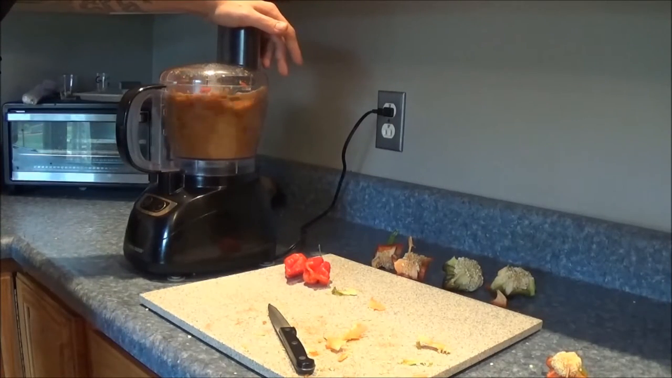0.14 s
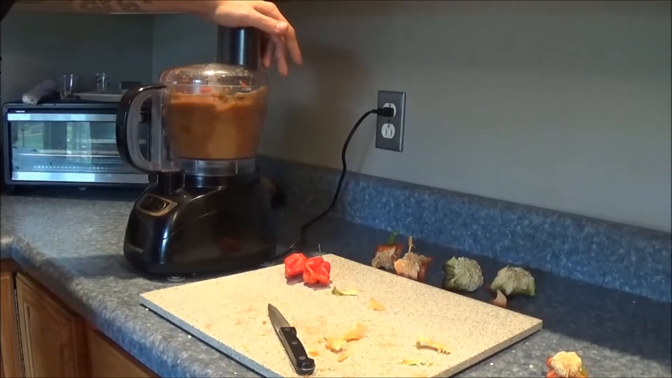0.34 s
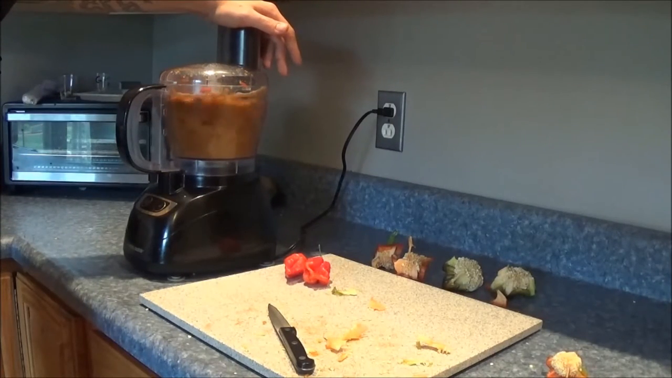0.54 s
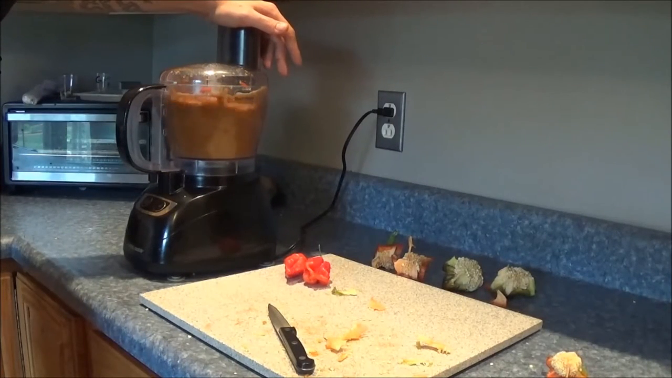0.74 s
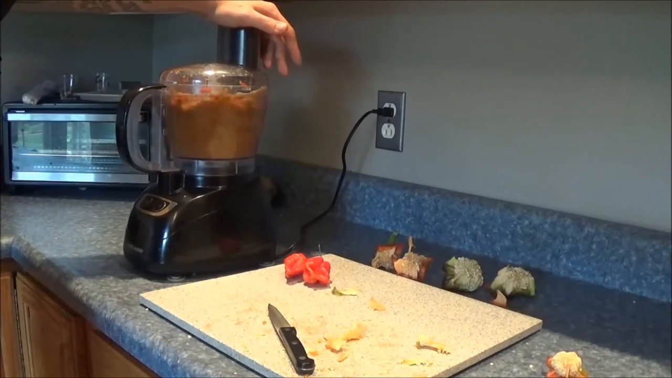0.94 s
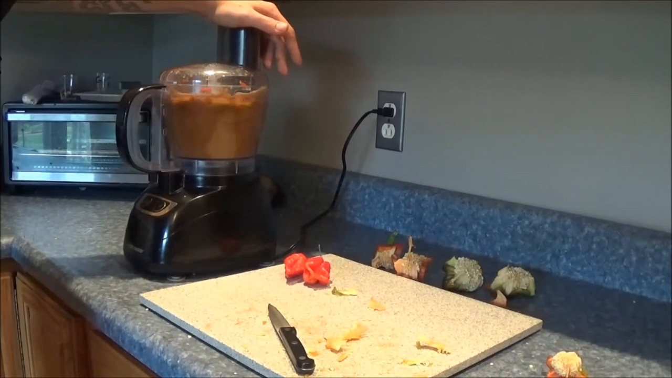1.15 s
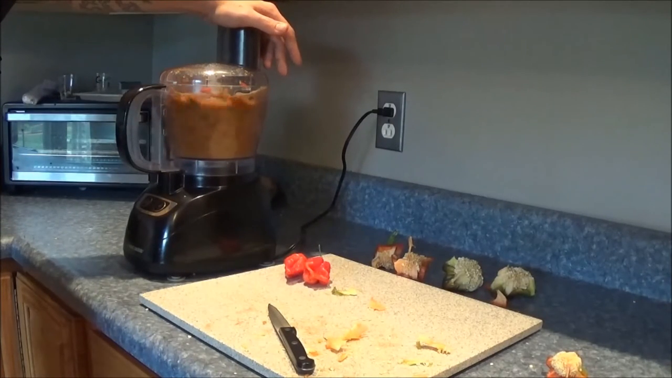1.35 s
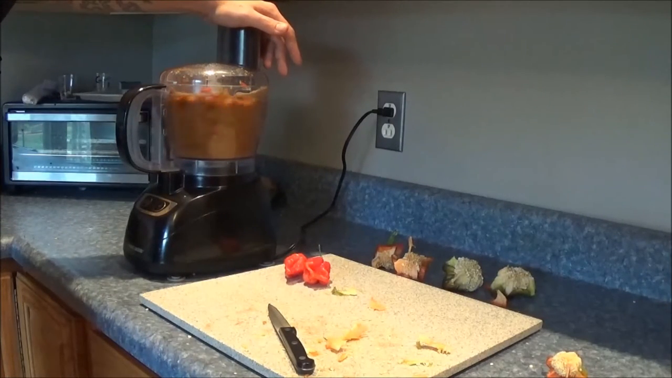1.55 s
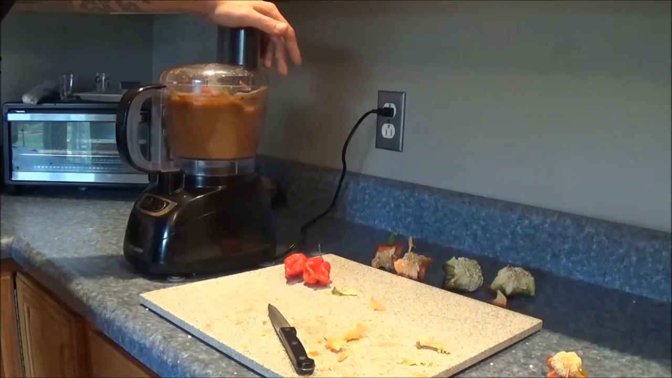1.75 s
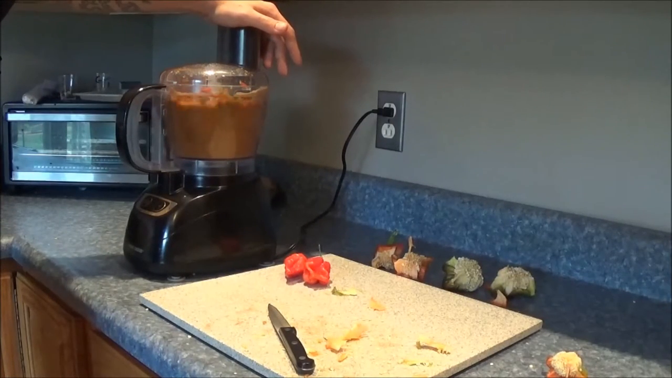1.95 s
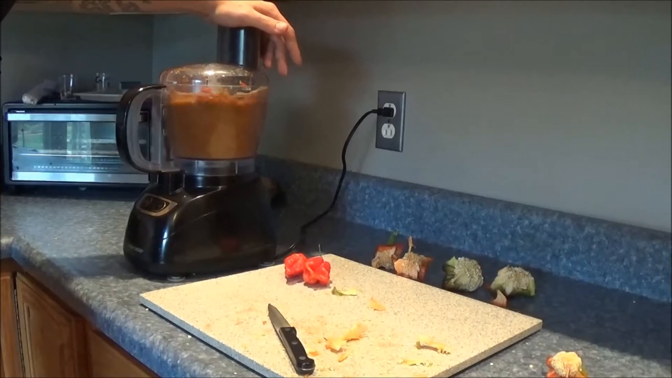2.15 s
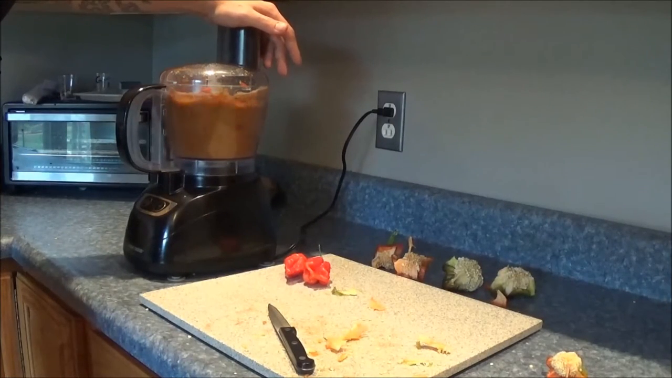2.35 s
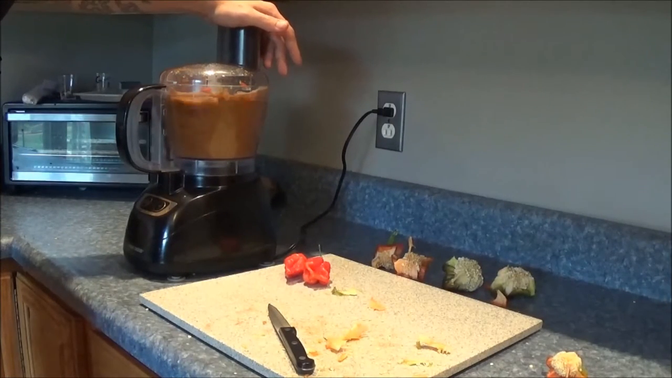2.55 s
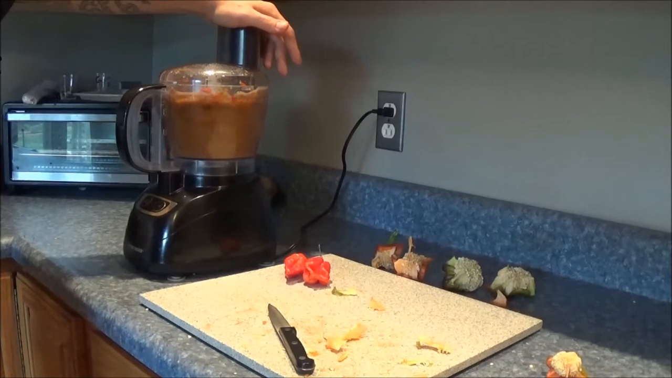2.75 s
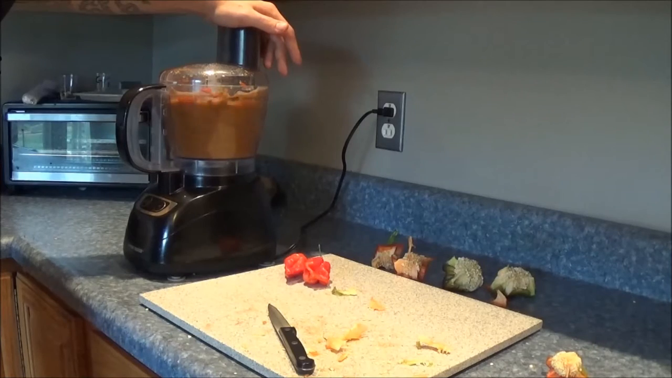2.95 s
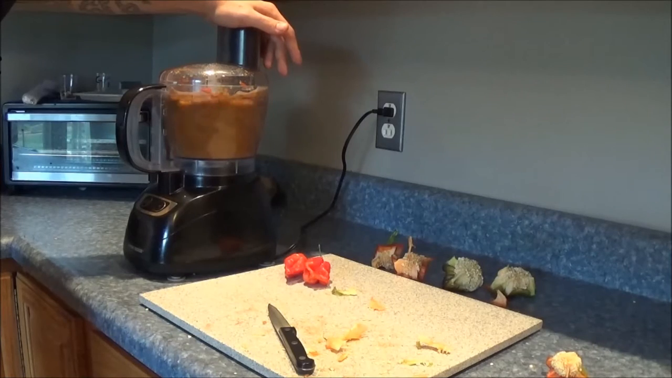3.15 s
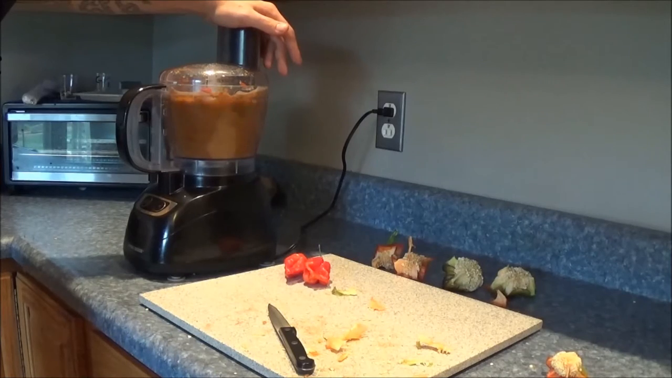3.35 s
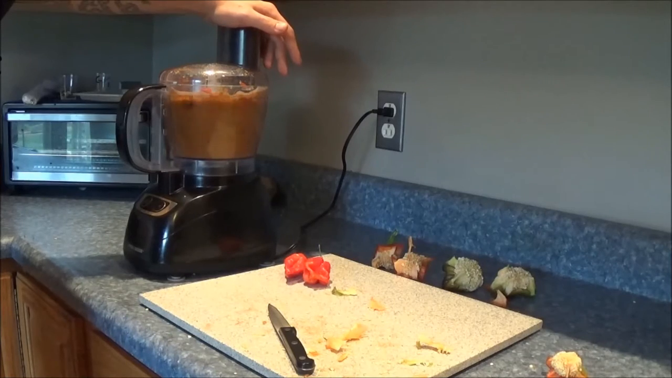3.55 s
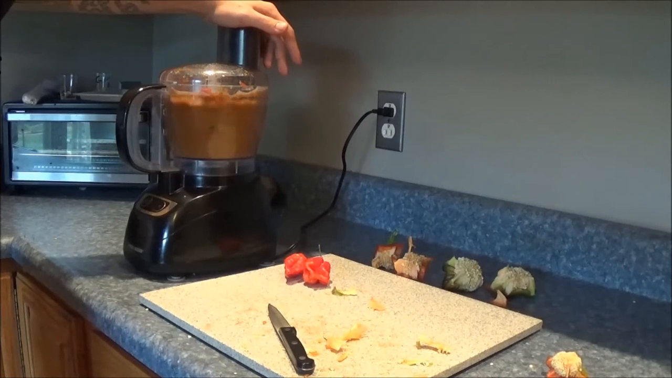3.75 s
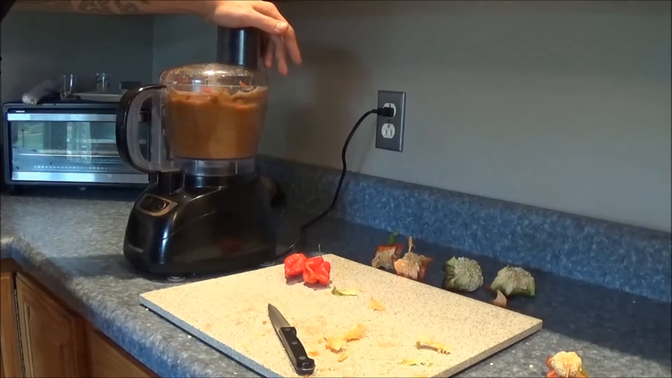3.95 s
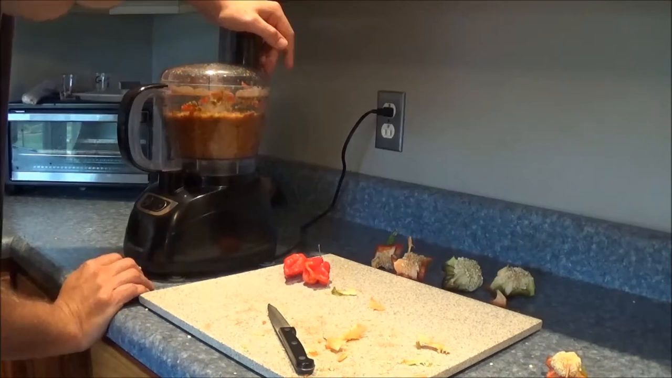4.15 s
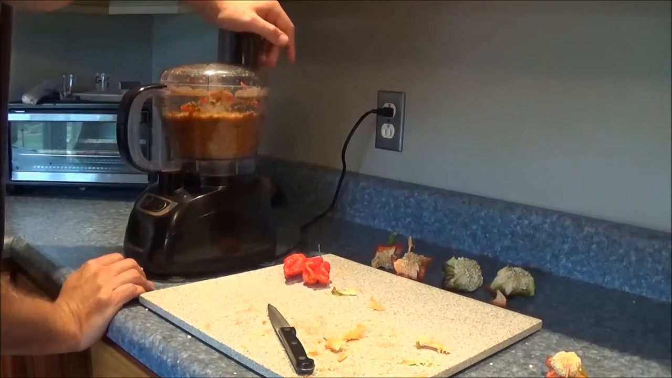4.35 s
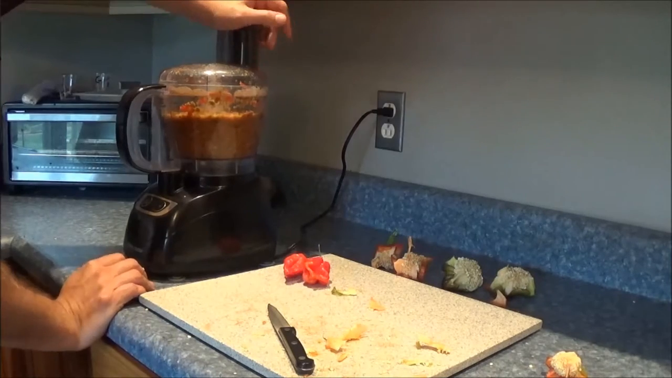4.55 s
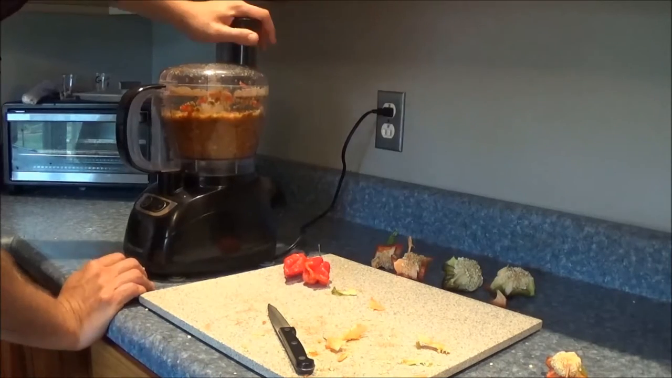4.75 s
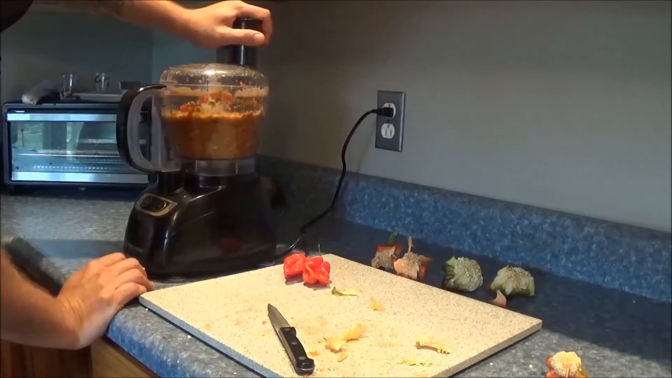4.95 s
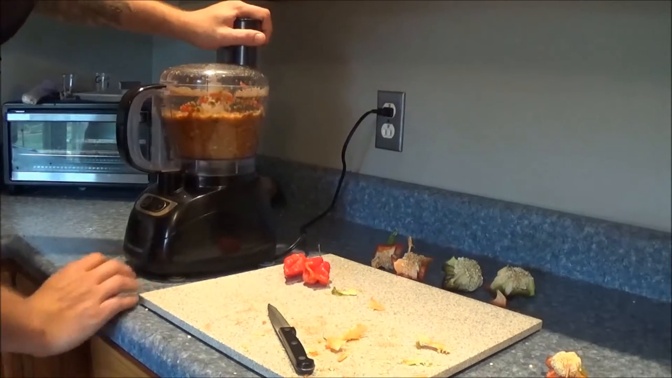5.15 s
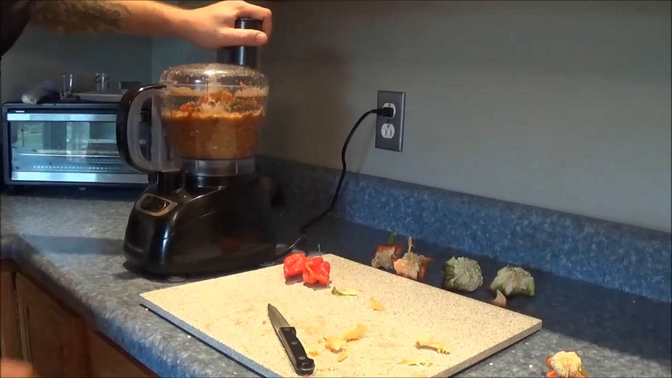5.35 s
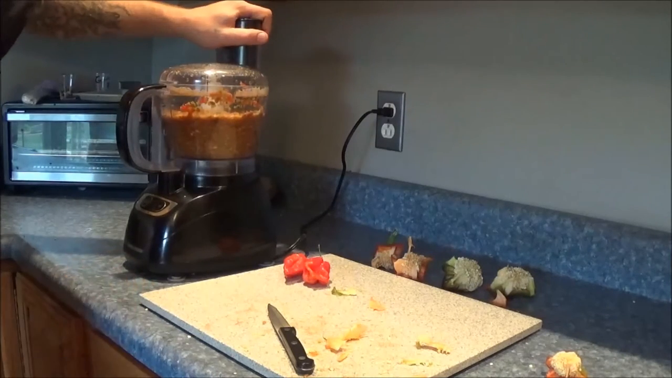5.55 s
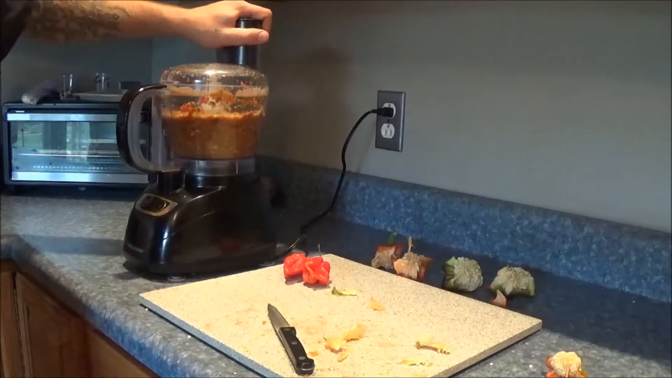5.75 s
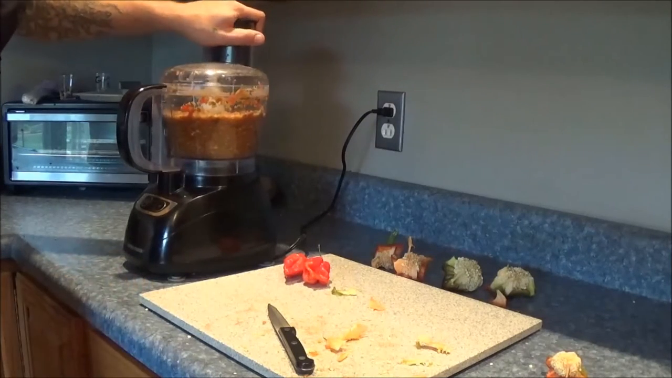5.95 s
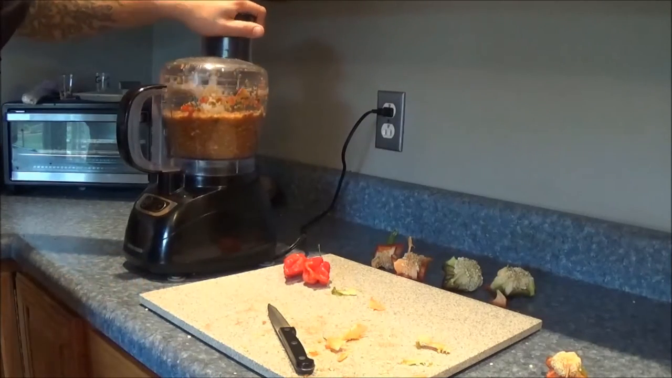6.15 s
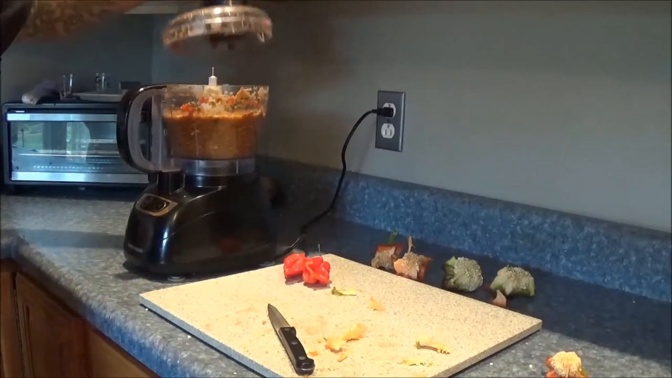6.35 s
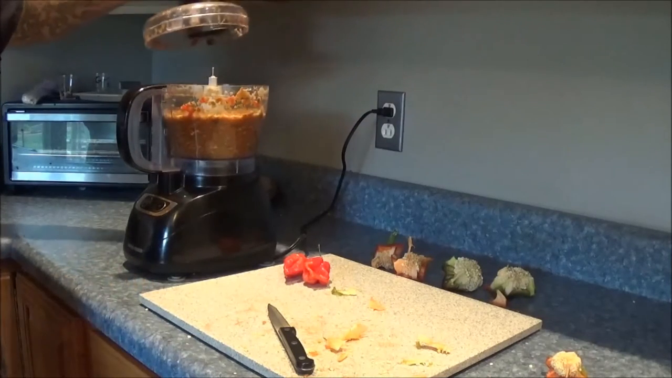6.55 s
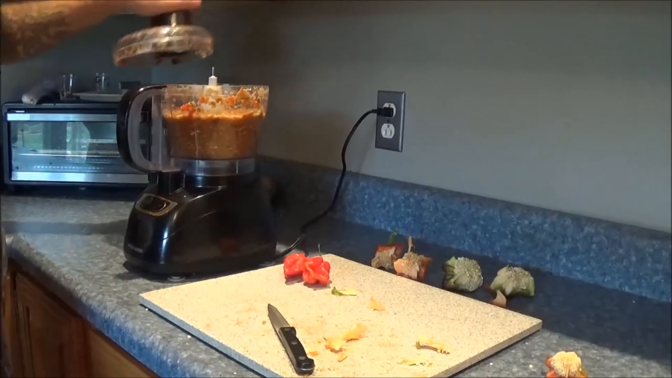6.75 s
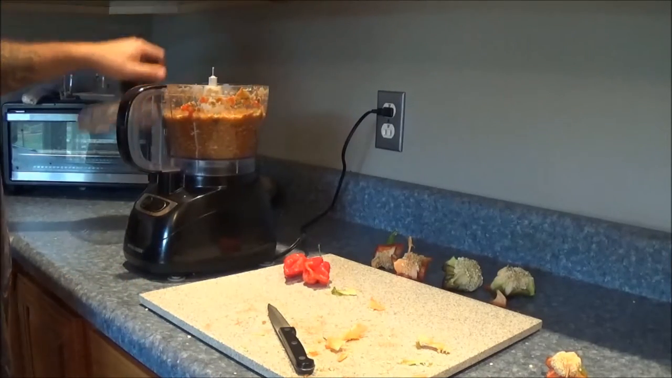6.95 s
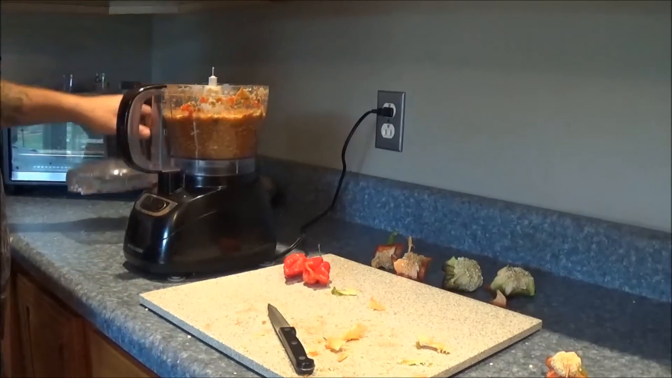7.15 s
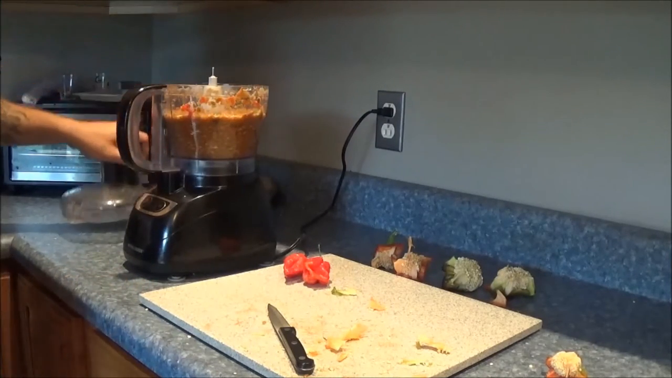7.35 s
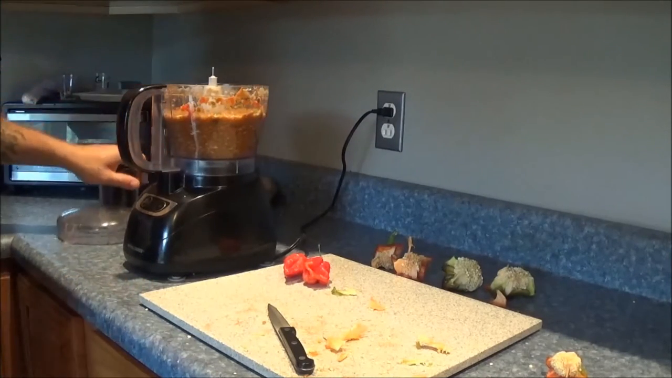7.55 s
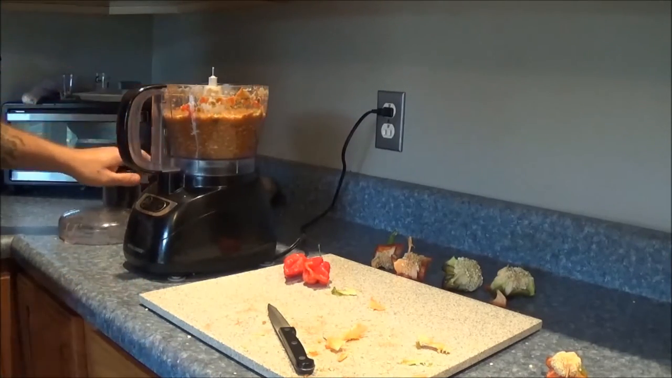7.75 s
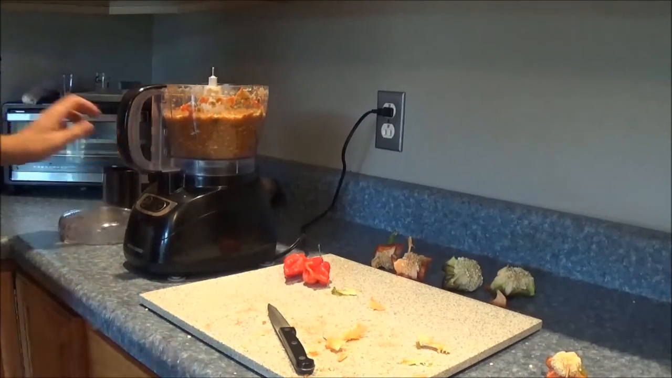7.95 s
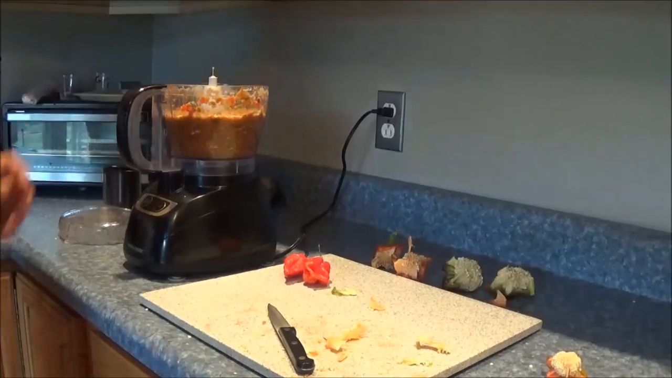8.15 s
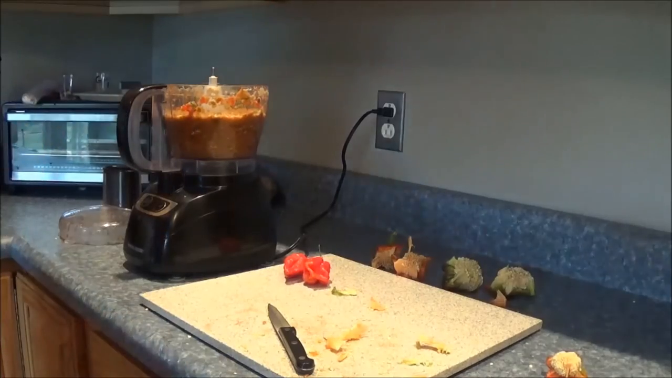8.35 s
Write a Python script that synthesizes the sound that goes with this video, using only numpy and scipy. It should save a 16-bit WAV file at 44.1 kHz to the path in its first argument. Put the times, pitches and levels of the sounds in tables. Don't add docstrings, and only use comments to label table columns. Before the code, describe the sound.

Steady food processor noise, harsh and airy on top, fills the first half, then a hard cut leaves a quiet, small, lightly reverberant kitchen. Separate plastic sounds follow: a hollow grip knock, dull twisting catches, one sharp bright latch snap, quick rim taps, and the loudest lid landing on stone with a second bounce. Soft finger taps, low floor rumble and a close sleeve rustle surround them. Near stereo microphone.

```python
import sys
import numpy as np
from scipy import signal
from scipy.fft import rfft, irfft, next_fast_len
from scipy.io import wavfile
from scipy.ndimage import map_coordinates

SR = 44100
rng = np.random.default_rng(int(sys.argv[2]) if len(sys.argv) > 2 else 0)


def to_wav(sig):
    pcm = np.clip(np.atleast_2d(sig), -1, 1) * 32767
    pcm = np.round(pcm).astype(np.int16)
    wavfile.write(sys.argv[1], SR, pcm.T)


def level_to_linear(level):
    exponent = np.asarray(level, float) / 20
    return 10 ** exponent


N = 370969
CHANGE_S = 4.0165


def unit(x):
    return x / np.sqrt(np.mean(x ** 2) + 1e-20)


def along(points, hz):
    f, v = np.transpose(points)
    return np.interp(np.log(hz + 1), np.log(f + 1), v)


def curves(rows):
    s, *columns = np.transpose(rows)
    t = np.arange(N) / SR
    return [np.interp(t, s, column) for column in columns]


def wobble(rate):
    knots = rng.standard_normal(int(N * rate / SR) + 4)
    return map_coordinates(knots, [np.arange(N) * rate / SR])


def filtered(x, response):
    m = next_fast_len(x.shape[-1] + 4096)
    spectrum = rfft(x, m) * response(np.fft.rfftfreq(m, 1 / SR))
    return irfft(spectrum, m)[..., :x.shape[-1]]


def band_limit(x, top_hz, edge_hz, leak_db):
    def response(hz):
        steepness = np.clip((top_hz - hz) / edge_hz, -50, 50)
        return level_to_linear(leak_db / (1 + np.exp(steepness)))
    return filtered(x, response)


def stereo(pair, gain, alike):
    def mid_side_gain(hz):
        angle = np.arccos(np.clip(along(alike, hz), -1, 1)) / 2
        return gain(hz) * [np.cos(angle), np.sin(angle)]
    mid, side = filtered(pair, mid_side_gain)
    return unit(np.array([mid + side, mid - side]))


def swells(rows, floor_db=-120):
    t = np.arange(N) / SR
    power = level_to_linear(2 * floor_db)
    for s, db, rise, fall in rows:
        slope_db = -20 * np.maximum((s - t) / rise, (t - s) / fall)
        power = power + level_to_linear(2 * (db + slope_db))
    return np.sqrt(power)


def fade_in():
    t = np.arange(N) / SR
    return level_to_linear(-16 * np.clip(1 - (t - CHANGE_S) / 0.41, 0, 1))


def rumble():
    # (t/s, level/dB)
    floor_steps = [
        (4.63, -72.5),
        (5.27, -74.5),
        (5.8, -79),
        (6.0, -76),
        (6.8, -77.5),
        (7.5, -79),
        (8.03, -75),
        (8.41, -70),
    ]
    colour = [(8, -33.0), (25, 0.0), (60, -9), (130, -18), (300, -61.5)]  # (f/Hz, density/dB)
    low = stereo(rng.standard_normal((2, N)), lambda hz: level_to_linear(along(colour, hz)), [(50, 1.0)])
    rise_s, fall_s = 0.35, 1
    rows = [(s, db, rise_s, fall_s) for s, db in floor_steps]
    return fade_in() * swells(rows, floor_db=-80.5) * low


def camera():
    u = (np.arange(N) / SR - 5.2187) % (1 / 29.988)
    chirp = np.sin(2 * np.pi * (2750 * u + 22000 * u ** 2))
    return level_to_linear(2 * wobble(9.7)) * chirp * np.exp(-((u - .01) / 0.0029) ** 2)


def air():
    # (f/Hz, density/dB)
    air_colour = [(53, -35), (90, -6), (256, -7.5), (374, -8), (414, -9), (594, -12.5), (711, -15.5),
                  (819, -12.5), (1590, -19.5), (2960, -22), (3200, -21.5), (3760, -26.5), (4880, -27.5),
                  (10900, -30.5), (14200, -61.5), (22000, -120)]
    # (f/Hz, likeness/0-1)
    air_alike = [(60, 0.95), (180, 0.97), (550, 0.86), (1650, 0.34), (4970, 0.49), (15000, 1)]
    # (t/s, level/dB, rise/s, fall per 20 dB/s)
    stirred = [
        (4.55, -68, .1, 1.2),
        (5.9, -64, .1, .6),
        (7.65, -65, .15, .45),
        (8.25, -69, .15, 2.5),
    ]
    hush = stereo(rng.standard_normal((2, N)), lambda hz: level_to_linear(along(air_colour, hz)), air_alike)
    ticks = level_to_linear(-6) * camera() * level_to_linear([[1], [-1]])
    return fade_in() * swells(stirred, floor_db=-67) * (level_to_linear(0.56 * wobble(7.3)) * hush + ticks)


def rustle():
    # (f/Hz, density/dB)
    cloth_colour = [(200, -26), (600, -0.5), (2000, -5.5), (5000, -10), (9000, -8), (11000, -8)]
    # (loudest t/s, level/dB, rise/s, fall per 20 dB/s)
    cloth_strokes = [
        (4.57, -70, .07, .18),
        (5.1, -66, .1, .09),
        (5.558, -52, .016, .045),
        (6.14, -61.5, .2, .05),
        (7.14, -73, .25, .6),
        (7.987, -56, .012, .025),
        (8.03, -69, .05, .6),
        (8.34, -56, .28, .8),
    ]
    cloth = stereo(rng.standard_normal((2, N)), lambda hz: level_to_linear(along(cloth_colour, hz)), [(1000, 0.79)])
    return swells(cloth_strokes) * level_to_linear(1.8 * wobble(60)) * cloth


def ringing(modes, t, blur):
    ring = 0
    for hz, db, t60 in modes:
        drift = blur * np.cumsum(rng.standard_normal(len(t))) / np.sqrt(SR)
        decay = level_to_linear(db + rng.normal(0, 1) - 60 * t / t60)
        ring = ring + decay * np.sin(2 * np.pi * hz * t + drift)
    return ring * (1 - np.exp(-t / 0.00217))


def nudges():
    # (t/s, peak/dB, f/Hz, rise/s, t60/s)
    pushes = [(4.115, -69, 130, .01, .12), (4.592, -44, 610, .012, .08), (5.765, -65, 95, .008, .25),
              (5.97, -61, 260, .008, .1), (6.375, -62, 200, .015, .1), (6.4, -62, 220, .01, .1),
              (6.515, -59, 530, .02, .2), (7.05, -66, 640, .04, .4), (7.11, -58, 620, .03, .3),
              (7.58, -50, 190, .01, .2), (8.208, -57, 45, .008, .15), (8.208, -59, 240, .005, .1)]
    out, t = np.zeros(N + SR), np.arange(SR // 2) / SR
    for s, db, hz, rise, t60 in pushes:
        swell = 1 + t60 / rise / 7
        push = swell * (1 - np.exp(-t / rise)) * ringing([(hz, db + 4, t60)], t, blur=16)
        out[round(s * SR):][:len(t)] += push
    return out[:N]


def squeak():
    # (t/s, length/s, first f/Hz, fall/Hz, level/dB)
    seal_slips = [
        (6.74, .15, 5440, 560, -89),
        (6.89, .075, 4850, 320, -87),
    ]
    out = np.zeros(N)
    for s, long_s, hz, fall_hz, db in seal_slips:
        u = np.clip((np.arange(N) / SR - s) / long_s, 0, 1)
        pitch = hz - fall_hz * u ** 2 + 30 * wobble(40)
        level = np.abs(np.sin(np.pi * u)) ** .5 * np.sqrt(2) * level_to_linear(db + 2.5 * wobble(40))
        out += level * np.sin(2 * np.pi * np.cumsum(pitch) / SR)
    return out


def tail():
    # (f/Hz, t60/s)
    kitchen_decay = [(150, .55), (1000, .52), (2000, .42), (4000, .39), (7700, .33), (11000, .29)]
    # (f/Hz, likeness/0-1)
    room_alike = [(100, .95), (300, .92), (600, .72), (1200, .6), (2000, .72), (4000, .55), (10000, .6)]
    hz, t, z = signal.stft(rng.standard_normal((2, SR // 2)), SR, nperseg=256)
    room = level_to_linear(-60 * t / along(kitchen_decay, hz)[:, None])
    counter = level_to_linear(along([(500, -2), (8000, 3)], hz)[:, None] - 60 * t / .07)
    noise = signal.istft(z * (room + counter), SR, nperseg=256)[1]
    pair = stereo(noise, np.ones_like, room_alike)
    return pair / np.sqrt(pair.shape[1])


def contacts(events, t60, top_db, modes=(), ring_db=-6, wet_db=-3):
    out, t = np.zeros((2, N + SR)), np.arange(SR // 4) / SR
    for s, db, low_db, mid_db in events:
        points = [(35, low_db - 37.5), (90, low_db - 17.5), (250, low_db - 3.5), (450, low_db + 4.5),
                  (700, low_db + 5.0), (2000, 0.0032), (3300, 0.25 * mid_db), (5000, mid_db + 1.5),
                  (9000, mid_db + top_db)]
        colour = lambda hz: level_to_linear(along(points, hz))
        crack = level_to_linear(6 - 60 * t / t60) * filtered(rng.standard_normal(len(t)), colour)
        ring = level_to_linear(ring_db) * ringing(modes, t, blur=10.1)
        room = tail()
        wet = level_to_linear(-0.5) * signal.fftconvolve(ring[None], room, axes=1)[:, :room.shape[1]]
        wet = wet + level_to_linear(8.5) * np.sqrt(t60 * SR / np.log(1e6)) * filtered(room, colour)
        out[:, round(s * SR):][:, :len(t)] += level_to_linear(db) * (crack + ring) * level_to_linear([[.4], [-.4]])
        out[:, round((s + .003) * SR):][:, :wet.shape[1]] += level_to_linear(db + wet_db) * wet
    return out[:, :N]


def dry_ticks():
    # (t/s, peak/dB, low/dB, mid/dB)
    taps = [
        (4.1111, -57, 0, -14.5),
        (4.588, -51.5, 5, -8.5),
        (4.6278, -54, 10, -6.5),
        (4.6882, -63, -2, -9),
        (7.2265, -56.5, -4, -6.5),
        (7.6394, -49, -8, -6),
        (7.6684, -43, 0, -8),
        (7.9977, -54, 5.5, 0.5),
        (8.1684, -51.5, 5, -6.5),
        (8.2073, -44, -3.5, -8),
    ]
    return contacts(taps, t60=0.019, top_db=2.5, wet_db=-1.0)


def lid_twists():
    # (t/s, peak/dB, low/dB, mid/dB)
    catches = [
        (4.811, -43.5, 0, 4.5),
        (5.0836, -46, -12, -6),
        (5.1394, -60.5, -10, -2),
        (5.664, -60.5, -9, -5),
        (5.974, -57, 13, 1.5),
        (6.1597, -62.5, 8, -9),
    ]
    return contacts(catches, t60=0.037, top_db=-12.0, wet_db=-2.5)


def grip():
    # (t/s, peak/dB, low/dB, mid/dB)
    bowl_knock = [
        (4.3988, -34.5, -0.77, -12),
    ]
    # (f/Hz, level/dB, t60/s)
    bowl_modes = [(348, -9.5, 0.33), (583, -9, .08), (1150, 0, 0.08), (1440, 7, 0.025)]
    return contacts(bowl_knock, t60=0.024, top_db=3.0, modes=bowl_modes, ring_db=-5.5, wet_db=-3.0)


def unlock():
    # (t/s, peak/dB, low/dB, mid/dB)
    latch_snaps = [
        (5.7425, -45.5, 3.5, 0.18),
        (5.7625, -22.5, -7.5, 0.82),
    ]
    # (f/Hz, level/dB, t60/s)
    latch_modes = [(620, -9, 0.21), (836, -7.5, 0.1), (1173, -2, 0.11), (1412, -2, .07), (2755, 1.5, 0.061),
                   (5450, 0, 0.04)]
    return contacts(latch_snaps, t60=.034, top_db=.2, modes=latch_modes, ring_db=-7, wet_db=-1.5)


def lift():
    # (t/s, peak/dB, low/dB, mid/dB)
    rim_knocks = [
        (6.4288, -41.5, 0.91, -14.5),
        (6.4502, -42, 1.32, -13),
    ]
    # (f/Hz, level/dB, t60/s)
    rim_modes = [(535, -2, .14), (930, -5, .1), (1150, -4, .13), (1300, -6, .08), (1790, -8, .18),
                 (2400, -7, .06), (2800, -2, .04), (3290, -2, .04), (5450, -18, .08), (6200, -17, .1),
                 (7850, -15, .1)]
    return contacts(rim_knocks, t60=0.024, top_db=-2.2, modes=rim_modes, ring_db=-2.5, wet_db=-3)


def set_down():
    # (t/s, peak/dB, low/dB, mid/dB)
    landing = [
        (7.461, -18.5, -8, -14.5),
    ]
    # (t/s, peak/dB, low/dB, mid/dB)
    rebound = [
        (7.5762, -27, 0.5, -19.5),
    ]
    # (f/Hz, level/dB, t60/s)
    lid_modes = [(142, -21, 0.11), (286, -22.5, 0.065), (475, -17.5, 0.13), (526, -22, 0.1),
                 (613, -12, 0.24), (636, -11.5, 0.11), (721.6, -2.5, 0.13), (790, -10, 0.076),
                 (926, -10.5, 0.076), (983, -18.5, 0.21), (1095, -20, 0.14), (1218, -14, 0.073),
                 (1272, -16.5, 0.12), (1704, -12, .06), (2210, -21, 0.13)]
    landed = contacts(landing, t60=0.044, top_db=-0.8, modes=lid_modes, ring_db=6.0, wet_db=-1.5)
    return landed + contacts(rebound, t60=0.04, top_db=-2, modes=lid_modes, ring_db=-7.5, wet_db=-2.5)


def processor():
    # (t/s, gear whine f/Hz, level/dB)
    motor_run = [(0, 1011, -43.1), (.3, 1014.5, -43), (1.7, 1018, -43), (2.45, 1023.5, -43),
                 (4.02, 1030, -42.9)]
    # (multiple of the turn, level/dB rms)
    shaft_orders = [(7, -89.5), (10, -84.5), (17, -81), (21, -85), (24, -68.5), (27, -76.5), (28, -80.5),
                    (31, -77.5), (35, -83), (45, -78.5), (46, -90.5), (53, -76)]
    turn_beat = [(3, 0.04), (4, 0), (5, 0.03), (6, 0), (7, 0), (9, 0), (10, 0.08), (12, 0.02), (19, 0.06),
                 (26, 0.03)]
    # (f/Hz, density/dB)
    whir_colour = [(18, -65), (30, -42.5), (208, -30), (422, -19.5), (641, -28.5), (711, -17.5), (949, -17),
                   (1030, -10.5), (1230, -16.5), (2080, -16), (5920, -4.5), (8550, -7.5), (11400, -0.5),
                   (15600, -13.5)]
    # (f/Hz, width/Hz, level/dB)
    housing_modes = [(3450, 33, -11), (4080, 120, -11), (4600, 29, -9), (5960, 130, -4), (6490, 220, -4),
                     (7270, 61, -10), (7760, 79, -6), (8060, 150, -7), (8680, 54, -7), (9010, 46, -7),
                     (9750, 300, -6), (10100, 93, -7), (10700, 26, -3), (11200, 53, -1), (11400, 120, 0),
                     (11700, 61, 0), (12200, 76, -2), (12900, 81, -6), (13800, 100, -7), (14300, 130, -8),
                     (15000, 110, -7), (520, 90, -22), (3450, 30, -12), (5700, 40, -3), (10400, 60, -3),
                     (10790, 40, -1), (10930, 50, -2), (11145, 35, 2), (15550, 300, -5)]
    # (f/Hz, likeness/0-1)
    whir_alike = [(60, 0.87), (180, 1), (550, 1), (1650, 0.95), (4970, 0.81), (15000, 0.91)]

    whine_hz, level_db = curves(motor_run)
    teeth = 24
    turn = 2 * np.pi * np.cumsum(whine_hz * (1 + 0.00071 * wobble(9.04))) / teeth / SR
    tones = 0
    for k, db in shaft_orders:
        tones = tones + np.sqrt(2) * level_to_linear(db + 1.3 * wobble(11)) * np.sin(k * turn + 7 * rng.random())
    beat = 1
    for k, depth in turn_beat:
        beat = beat + depth * np.cos(k * turn + 7 * rng.random())

    def gain(f):
        power = sum(level_to_linear(2 * db) / (1 + (1.3 * (f - c) / w) ** 2) ** 2 for c, w, db in housing_modes)
        return np.hypot(level_to_linear(along(whir_colour, f)), level_to_linear(2.5) * np.sqrt(power))

    whir = stereo(rng.standard_normal((2, N)) * beat, gain, whir_alike)
    t = np.arange(SR // 10) / SR
    echoes = rng.standard_normal((2, SR // 10)) * level_to_linear(-60 * t / 0.42)
    whir += level_to_linear(-11) * unit(signal.fftconvolve(whir, echoes, axes=1)[:, :N])
    return level_to_linear(level_db + 0.21 * wobble(5.17)) * unit(whir) + tones


def scene():
    quiet = rumble() + air() + rustle() + nudges() + squeak()
    quiet += dry_ticks() + lid_twists()
    quiet += grip() + unlock() + lift() + set_down()
    quiet = band_limit(quiet, top_hz=11200, edge_hz=60, leak_db=-50)
    machine = band_limit(processor(), top_hz=15750, edge_hz=12, leak_db=-60)
    running = np.clip((CHANGE_S - np.arange(N) / SR) / 0.00084, 0, 1)
    return running * machine + (1 - running) * quiet


def low_pass(x):
    return signal.sosfilt(signal.butter(12, 16670, fs=SR, output="sos"), x)


def record(dry):
    mix = dry + level_to_linear(-106) * rng.standard_normal(dry.shape)
    return low_pass(mix)


dry = scene()
out = record(dry)
to_wav(out)
```